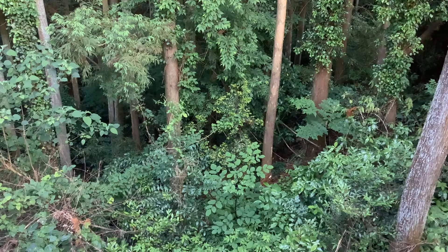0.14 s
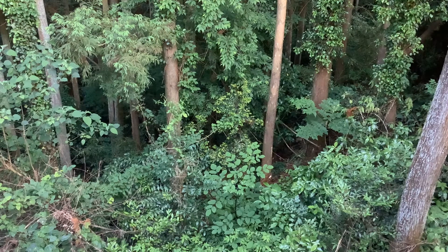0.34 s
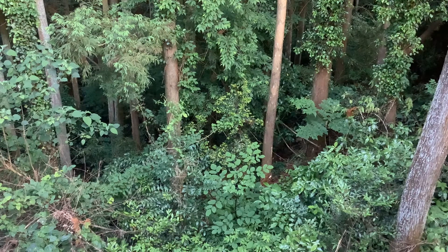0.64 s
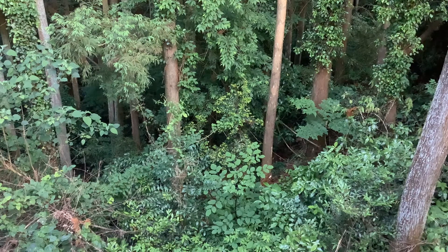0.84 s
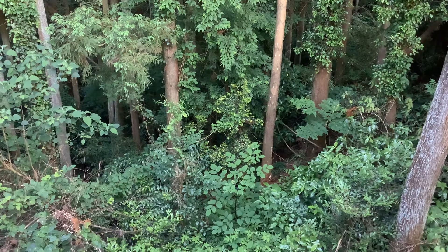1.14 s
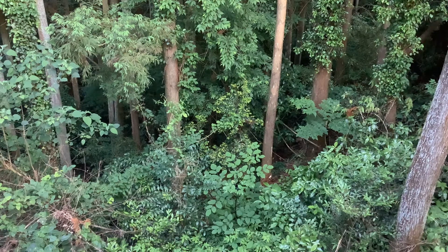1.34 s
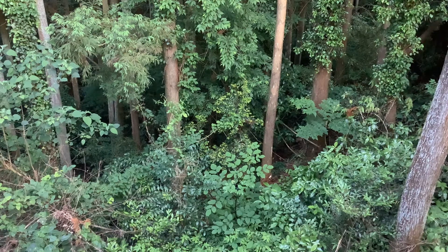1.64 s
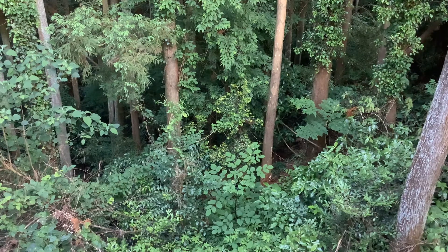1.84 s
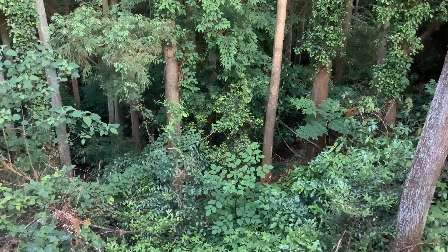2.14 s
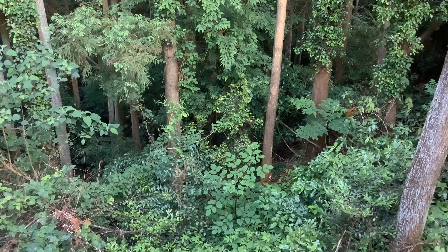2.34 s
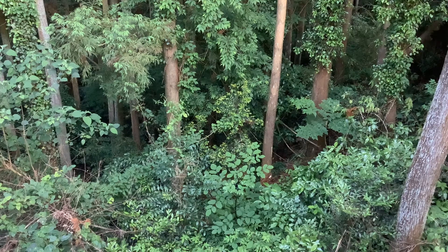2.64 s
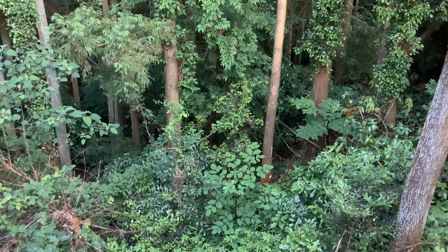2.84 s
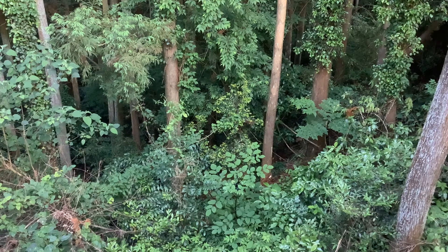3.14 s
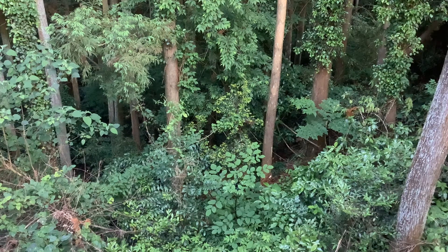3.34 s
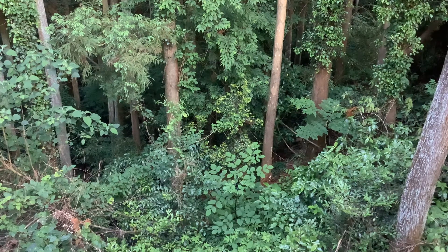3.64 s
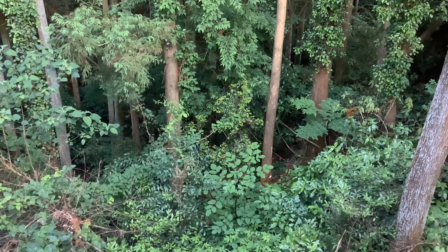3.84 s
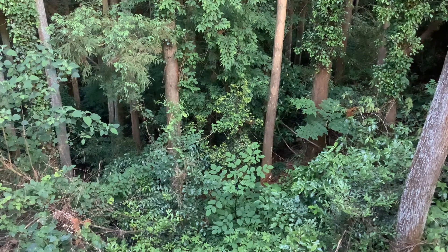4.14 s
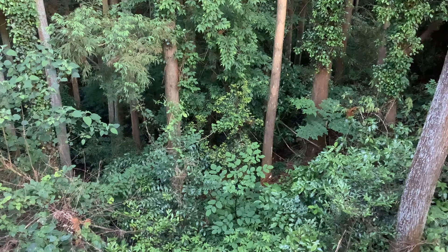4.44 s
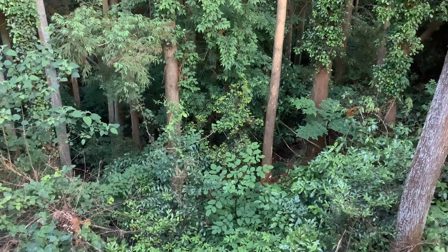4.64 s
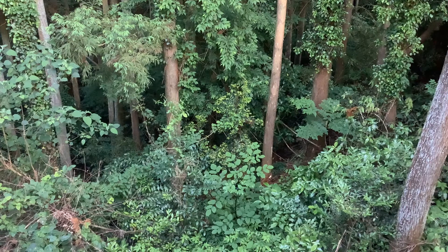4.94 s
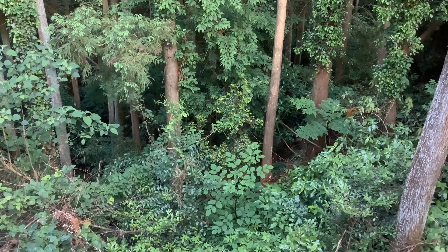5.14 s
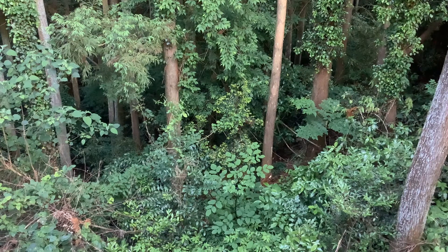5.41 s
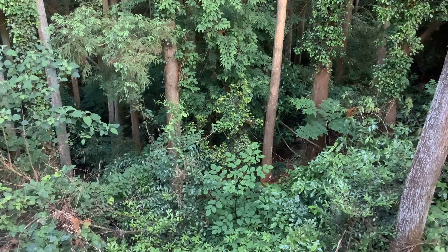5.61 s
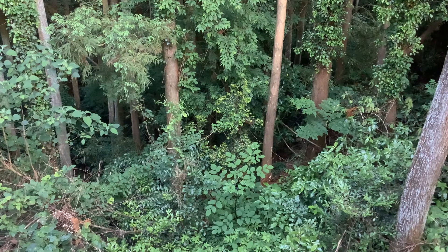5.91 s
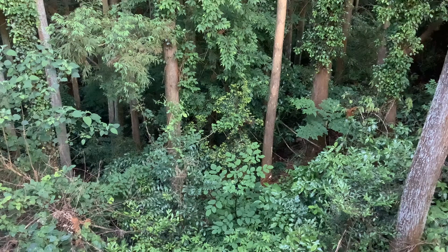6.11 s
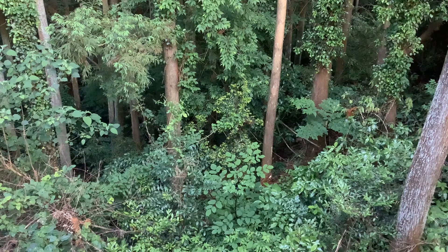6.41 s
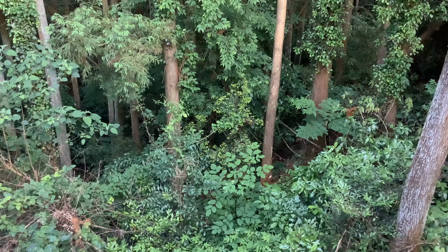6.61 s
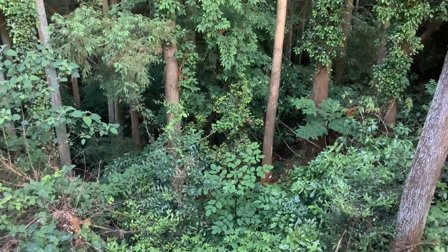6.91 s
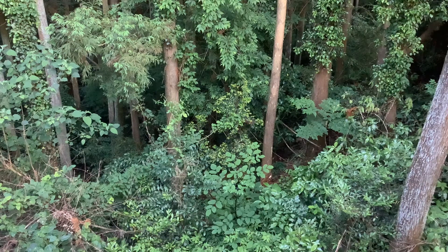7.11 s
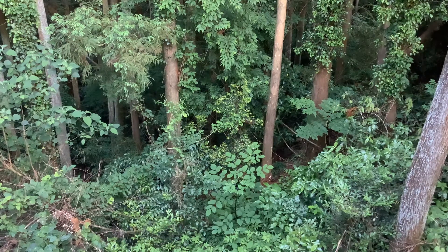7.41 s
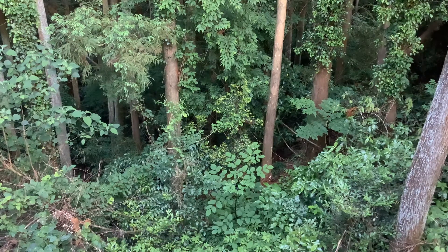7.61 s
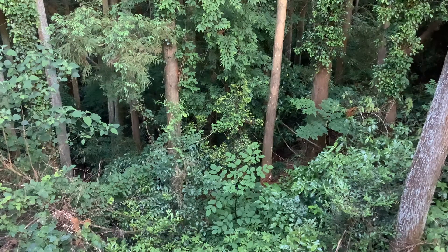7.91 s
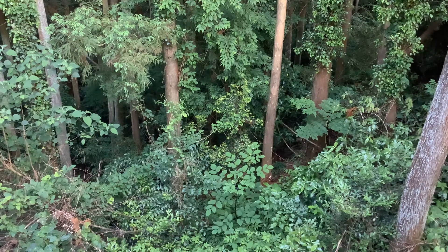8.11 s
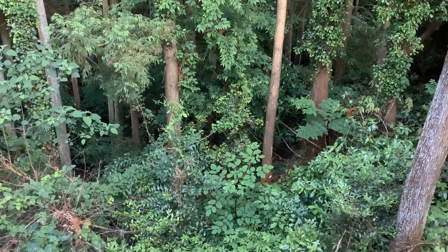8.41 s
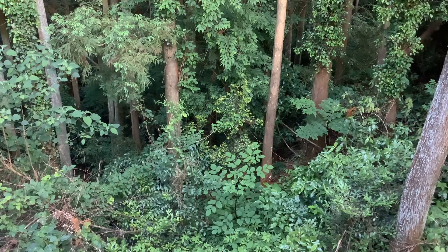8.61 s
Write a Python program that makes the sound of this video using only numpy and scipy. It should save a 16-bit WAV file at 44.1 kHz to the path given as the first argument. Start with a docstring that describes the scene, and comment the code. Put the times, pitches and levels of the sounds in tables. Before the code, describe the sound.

A calm woodland with a very quiet, low distant rumble and a thin hiss of leaves and still air throughout. At about 0.3 s a lesser cuckoo gives five quick, nearly pure whistles until 1.15 s, the first gliding upward, the others rising then falling. Trunks echo them and the wood rings on. From 0.5 s dry leaves brush grainily near the microphone, fading after 0.9 s, with a strong twig crack and dull knock at 0.6 s and smaller ticks through 1.8 s. Thin, blurred far birds twitter from 1.7 to 3.7 s. Slightly louder five-note calls come at 3.3-4.1 s and 5.85-6.65 s. Faint ticks and a soft knock fall around 5-5.6 s, with more distant warbles then and from 6.8 s. A final call starts at 8.35 s with only three notes, as the rumble swells slightly.

```python
"""A lesser cuckoo calls four times at the edge of a cedar wood: quick near-pure whistles that glide in pitch.
A full call has five notes, the first rising and the rest rising then falling; the last call has only three.
Ground and trunks echo them and the wood rings on. Behind lie a low distant rumble and a hiss of leaves and
still air, both filtered noise. Near the microphone a grainy brush of noise rustles the leaves, and dry twigs
tick and knock in short bursts. Small birds far off sing thin warbled slurs, heard only by way of the trees."""
import sys
import numpy as np
from scipy import signal
from scipy.fft import rfft, irfft, next_fast_len
from scipy.io import wavfile
from scipy.ndimage import uniform_filter1d

SR = 44100
rng = np.random.default_rng(int(sys.argv[2]) if len(sys.argv) > 2 else 0)


def int16_out(signal):
    """Quantize to a 16-bit WAV file."""
    q = np.round(np.clip(np.atleast_2d(signal).T, -1, 1) * 32767)
    wavfile.write(sys.argv[1], SR, q.astype(np.int16))


N = 386316
TIME = np.arange(N) / SR


def from_db(db):
    """Decibels to amplitude gain."""
    return 10 ** (np.asarray(db) / 20)


def at_hz(points, hz, axis=1):
    """Read a column of a table on a log-frequency axis."""
    table = np.array(points, float)
    log_hz = np.log(np.maximum(hz, 1))
    return np.interp(log_hz, np.log(table[:, 0]), table[:, axis])


def noise(colour):
    """White noise shaped to a given spectrum, rms 1."""
    size = next_fast_len(N)
    white = rfft(rng.standard_normal(size))
    hz = np.arange(len(white)) * SR / size
    x = irfft(white * from_db(at_hz(colour, hz)), size)[:N]
    return x / x.std()


def wander(count, size):
    """Random wavering: noise averaged over `size` samples, spread 1."""
    x = uniform_filter1d(rng.standard_normal(count), size=size)
    return x / x.std()


def grainy(colour, grain_db):
    """Friction noise that comes in millisecond grains, rms 1."""
    x = noise(colour) * from_db(grain_db * wander(N, size=60))
    return x / x.std()


def level(rows):
    """Gain over time from rows of (t/s, level/dB)."""
    return from_db(np.interp(TIME, *np.transpose(rows)))


def dying(t, t60):
    """Exponential decay, 60 dB down after t60 seconds."""
    return from_db(-60 * t / t60)


def add(out, start, x):
    """Mix x in at a time in seconds."""
    i = int(np.clip(round(start * SR), 0, N))
    out[i:i + len(x)] += x[:N - i]


# spectrum of the distant rumble: (f/Hz, relative level/dB)
RUMBLE_COLOUR = [(15, -65), (25, -48), (49, -5), (102, 3), (136, -2), (179, -1.5), (257, -5), (350, -6),
                 (484, -8), (626, -7), (694, -16), (977, -14.5), (1180, -17.5), (1330, -39.5), (1500, -30),
                 (1950, -58), (3300, -120)]
# level of the rumble over time: (t/s, level/dB)
RUMBLE_LEVEL = [(0, -61.5), (2.6, -63), (3.6, -60), (5.5, -61.5), (7.2, -61.5), (8.2, -60), (8.56, -57.5),
                (8.76, -60)]
# spectrum of leaves and still air: (f/Hz, relative level/dB)
HISS_COLOUR = [(1000, -5), (1600, 2.5), (2600, -1), (4000, 3), (5500, -4), (8000, -4), (10500, -4),
               (13000, -8.5), (16000, -5.5)]


def background(hiss_db=-80.5):
    """Low distant rumble of slowly changing level, and a steady hiss of leaves and still air."""
    rumble = level(RUMBLE_LEVEL) * noise(RUMBLE_COLOUR)
    hiss = from_db(hiss_db) * noise(HISS_COLOUR)
    return rumble + hiss


ONSET_HZ = 1306     # every note starts here, before its pitch ratio
SLIDE_SKEW = .72    # under 1, the slide to the end pitch is steep first and then flattens


def glides(rows):
    """Each glide shoots up and rounds off, then slides to its end pitch: upward in the first note, else downward."""
    parts, from_hz = [], ONSET_HZ
    for rise_ms, turn_hz, slide_ms, end_hz in rows:
        rise_t, slide_t = (np.linspace(0, 1, int(ms * SR / 1000)) for ms in (rise_ms, slide_ms))
        rise = 1 - (1 - rise_t) ** 2
        remaining = np.cos(np.pi / 2 * slide_t ** SLIDE_SKEW) ** 2
        parts.append(from_hz + (turn_hz - from_hz) * rise)
        parts.append(end_hz + (turn_hz - end_hz) * remaining)
        from_hz = end_hz
    return uniform_filter1d(np.concatenate(parts), size=130)


# the whistle grows with pitch up to the top of its range: (f/Hz, level/dB)
THROAT = [(1150, -54.5), (1500, -33), (1830, -24.5), (2030, -21.5), (2190, -12), (2400, -11.5)]
# strength of an overtone before effort and swell, by where it falls: (f/Hz, level/dB)
OVERTONES = [(2300, -45), (2900, -37.5), (3700, -51), (4600, -51.5), (5500, -59.5), (6700, -61),
             (7300, -57.5), (8700, -59), (10500, -53), (11800, -60.5), (14000, -66.5), (16000, -71)]
ATTACK_S, ATTACK_DB = 0.028, 27.5    # a note swells by this much
RELEASE_S, RELEASE_DB = 0.015, 35    # and stops by this much


def note(rows, ratio, db, overtone_share=0.21, press_db=6.0, slack_db=2.0, waver=0.0012):
    """A whistle whose level follows its pitch; overtones swell less, lean to the attack and slacken on falls."""
    pitch = ratio * glides(rows)
    t = np.arange(len(pitch)) / SR
    phase = 2 * np.pi * np.cumsum(pitch * (1 + waver * wander(len(t), size=30))) / SR
    attack = ATTACK_DB * np.maximum(1 - t / ATTACK_S, 0) ** 2
    release = RELEASE_DB * np.maximum(1 - (t[-1] - t) / RELEASE_S, 0) ** 2
    loud = db + at_hz(THROAT, pitch) - (attack + release)
    effort_db = loud + 12
    press = np.linspace(press_db, -press_db, len(t))
    falling = uniform_filter1d((np.gradient(pitch) < 0).astype(float), size=500)
    sound = from_db(loud) * np.sin(phase)
    for k in range(2, 8):      # effort counts for more in higher overtones, up to the fourth harmonic
        swell_db = overtone_share * min(k, 4) * effort_db + press - slack_db * (falling - .5)
        sound += from_db(at_hz(OVERTONES, k * pitch) + swell_db) * np.sin(k * phase)
    return sound * signal.windows.tukey(len(t), .1)


# the calls, note by note: (start t/s, pitch ratio, relative level/dB)
SONG = [
    [(.343, 0.99, -7.5), (.536, 1.02, -4.5), (.735, 0.98, -5.5), (.905, 0.99, -5), (1.052, 0.98, -3)],
    [(3.306, 1, -3), (3.49, 1.018, -1), (3.692, 0.99, -2.64), (3.863, 0.99, -3), (4.014, 0.99, -1.4)],
    [(5.85, 1, -1.5), (6.04, 1.014, 0.3), (6.245, 1.005, -1.8), (6.418, 0.99, -2), (6.574, 0.99, -0.96)],
    [(8.35, 0.97, -1.5), (8.536, .99, 0.1), (8.744, 0.97, 0)],
]
# five notes of one or two glides, before the pitch ratio: (rise t/ms, turn f/Hz, slide t/ms, end f/Hz)
NOTES = [
    [(35.7, 1965, 6.7, 2200)],
    [(14.7, 2076, 15, 1810), (22.32, 1905, 7, 1600)],
    [(16, 2150, 13, 1620), (10, 2010, 39, 1000)],
    [(23.02, 2380, 55, 920)],
    [(25.1, 2285, 54, 1470)],
]


def cuckoo():
    """Every call runs through the same notes in order, each with its own pitch ratio and level."""
    out = np.zeros(N)
    for call in SONG:
        for rows, (start, ratio, db) in zip(NOTES, call):
            add(out, start, note(rows, ratio, db))
    return out


# echoes off trunks, level before the bark dulls them: (delay t/ms, level/dB)
TRUNKS = [(6.5, -18.5), (45, -24), (58, -19.5), (80, -22.5), (125, -23), (178, -36)]


def near_paths(x, foliage_hz=5500, bark_hz=2800, smear_t60=0.11):
    """Direct sound dulled by foliage, a ground bounce notching the top of the highest notes, and trunk echoes."""
    ground_s, ground_gain = .00146, .75
    direct = signal.sosfilt(signal.butter(2, foliage_hz, fs=SR, output="sos"), x)
    out = direct.copy()
    add(out, ground_s, ground_gain * direct)
    out /= 1 + ground_gain
    t = np.arange(2000) / SR
    echoes = np.zeros(SR // 2)
    for ms, db in TRUNKS:      # rough bark and ivy smear and dull each echo
        smear = rng.standard_normal(len(t)) * dying(t, smear_t60)
        add(echoes, ms / 1000, from_db(db) * smear / np.linalg.norm(smear))
    echoes = signal.sosfilt(signal.butter(4, bark_hz, fs=SR, output="sos"), echoes)
    return out + signal.fftconvolve(x, echoes)[:N]


# the wood's ring by frequency: (f/Hz, relative level/dB, early t60/s, late t60/s)
WOOD = [(1170, 2, 0.46, 2.56), (2230, -18, 0.27, 1.56), (3107, -9.5, 0.29, 1.2), (4637, -4, 0.22, 1.2),
        (7890, -4, 0.19, .7), (15000, -7.5, .3, .6)]


def wood(x, late_db=-15, build_s=0.0039):
    """Scatter from leaves and trunks: a quick decay from near trees, a long faint one from deep in the wood."""
    t = np.arange(2 * SR) / SR
    response = np.zeros(len(t))
    edges = np.geomspace(900, 17000, 9)    # eight bands, Hz
    for low, high in zip(edges, edges[1:]):
        db, early, late = (at_hz(WOOD, np.sqrt(low * high), axis=k) for k in range(1, 4))
        decay = dying(t, early) + from_db(late_db) * dying(t, late)
        envelope = decay * (1 - np.exp(-t / build_s))
        band = signal.butter(2, [low, high], "band", fs=SR, output="sos")
        scatter = signal.sosfilt(band, rng.standard_normal(len(t)))
        response += from_db(db) * scatter * envelope / np.linalg.norm(envelope)
    return signal.fftconvolve(x, response)[:N]


# spectrum of the dry leaves: (f/Hz, relative level/dB)
RUSTLE_COLOUR = [(1590, -46), (2700, -6), (3160, -4.5), (3400, -6), (4190, 2), (4720, -9), (5990, -10.5),
                 (6800, -3), (7600, -10.5), (9020, -2), (9860, -10), (10600, -4.5), (12800, -11.5),
                 (15200, -8.5), (16000, -8.5)]
RUSTLE_START_S, RUSTLE_HOLD_S, RUSTLE_RELEASE_T60 = .497, .41, .38
RUSTLE_DB, RUSTLE_SAG_DB_PER_S = -55.5, 8.5
SETTLE_DB, SETTLE_S = -81, 1.507   # faint stirring, held this long from the start of the brush


def rustle(attack_s=0.0093, settle_t60=1.0):
    """A close brush through dry leaves starts at once, sags and lets go; the leaves then settle."""
    t = np.maximum(TIME - RUSTLE_START_S, 0)
    sag = from_db(RUSTLE_DB - RUSTLE_SAG_DB_PER_S * t)
    brush = sag * dying(np.maximum(t - RUSTLE_HOLD_S, 0), RUSTLE_RELEASE_T60)
    settle = from_db(SETTLE_DB) * dying(np.maximum(t - SETTLE_S, 0), settle_t60)
    attack = np.minimum(t / attack_s, 1)
    return attack * (brush + settle) * grainy(RUSTLE_COLOUR, grain_db=3.0)


# twig ticks near the microphone: (t/s, crack level/dB, crumble level/dB)
TICKS = [(0.6152, -23.5, -38), (.829, -45.5, -76), (0.874, -52, -71), (.888, -39.5, -52.5),
         (.951, -49, -74), (1.398, -55, -55.5), (1.692, -72, -67), (1.782, -61, -55), (2.563, -73, -69.5),
         (3.008, -57, -64), (4.9118, -76, -69.5), (5.3693, -59.5, -71), (5.5654, -51.5, -66)]
# spectrum of cracks and crumbles: (f/Hz, relative level/dB)
TICK_COLOUR = [(500, -1.5), (1500, 0.5), (3000, 2.5), (4300, 5), (6000, -4), (10000, 2.5), (16000, -5.5)]
# dull knocks of wood: (t/s, relative level/dB)
KNOCKS = [(0.614, -44), (1.399, -59), (4.989, -52)]
# spectrum of the knocks: (f/Hz, relative level/dB)
KNOCK_COLOUR = [(200, -31), (400, -35), (570, 12), (780, -4), (1050, 0), (1500, -14), (2500, -13),
                (5000, -48)]


def twigs(crack_t60=0.0055, crumble_t60=0.16, knock_t60=0.071, knock_rise_s=0.0065):
    """Each tick is a sharp crack and a crumble of dry fibres; thicker wood gives a dull knock."""
    crack, crumble, knock = np.zeros((3, N))
    t = np.arange(SR // 2) / SR
    for start, crack_db, crumble_db in TICKS:
        add(crack, start, from_db(crack_db) * dying(t, crack_t60))
        add(crumble, start, from_db(crumble_db) * dying(t, crumble_t60))
    for start, db in KNOCKS:
        add(knock, start, from_db(db) * t / knock_rise_s * dying(t, knock_t60))
    ticks = crack * noise(TICK_COLOUR) + crumble * grainy(TICK_COLOUR, grain_db=3.5)
    return ticks + knock * noise(KNOCK_COLOUR)


# the clearest slurs of the small far birds: (t/s, start f/Hz, end f/Hz, level/dB before gain_db)
SLURS = [(1.95, 4200, 5280, -80), (2.15, 4594, 5430, -75.5), (2.48, 4200, 5480, -80.5),
         (2.7, 4800, 5500, -80), (3.016, 2163, 2557, -60.5), (3.0, 4690, 5480, -77),
         (3.21, 4930, 5420, -77.5), (5.48, 3940, 4310, -75.5), (6.78, 4146, 3520, -69.5),
         (7.4, 4117, 4200, -82), (7.86, 4200, 4950, -83), (8.172, 4090, 5355, -77), (8.29, 5450, 4800, -75)]
# spells of random twitter: (start t/s, end t/s, level/dB before gain_db)
TWITTER = [(1.701, 2.9, -80.5), (3.101, 3.7, -82), (5.096, 5.805, -87.5), (6.998, 7.993, -91.5),
           (8.001, 8.597, -81.5)]
SLUR_S, TWITTER_GAP_S = .085, 0.098
TWITTER_LOW_HZ, TWITTER_HIGH_HZ = 3250, 5650


def far_birds(warble=0.027, warble_hz=55, gain_db=8):
    """Thin warbled slurs, a few clear ones amid random twitter, heard only by way of the trees, which blur them."""
    slurs = list(SLURS)
    for start, end, db in TWITTER:
        for beat in np.arange(start, end, TWITTER_GAP_S):
            late = rng.random() * TWITTER_GAP_S / 2
            from_hz, to_hz = rng.uniform(TWITTER_LOW_HZ, TWITTER_HIGH_HZ, 2)
            slurs.append((beat + late, from_hz, to_hz, db))
    out = np.zeros(N)
    t = np.arange(int(SLUR_S * SR)) / SR
    fade = signal.windows.tukey(len(t), .5)
    for start, from_hz, to_hz, db in slurs:
        wobble = warble * np.sin(2 * np.pi * (warble_hz * t + rng.random()))
        pitch = np.linspace(from_hz, to_hz, len(t)) * (1 + wobble)
        whistle = np.sin(2 * np.pi * np.cumsum(pitch) / SR)
        add(out, start, from_db(db + gain_db) * whistle * fade)
    return wood(out, late_db=-4, build_s=0.012)


def scene():
    """The cuckoo in its wood, with the small sounds around it."""
    far = background()
    voice = cuckoo()
    small_sounds = rustle() + twigs() + far_birds()
    return (near_paths(voice) + wood(voice) + small_sounds + far)[None]


def record(dry, bass_hz=49, cutoff_hz=15900):
    """The microphone drops the deepest bass; the top is cut steeply."""
    thin = signal.sosfilt(signal.butter(6, bass_hz, "high", fs=SR, output="sos"), dry)
    return signal.sosfilt(signal.ellip(12, .1, 80, cutoff_hz, fs=SR, output="sos"), thin)


dry = scene()
out = record(dry)
int16_out(out)
```